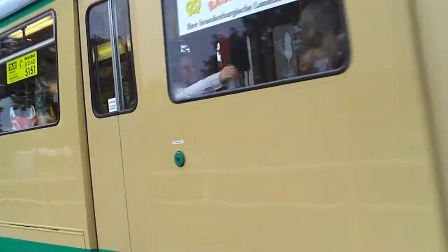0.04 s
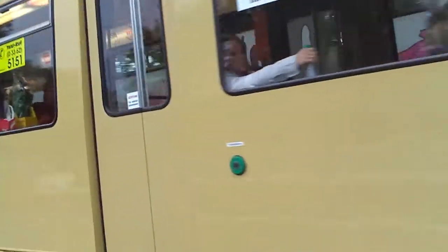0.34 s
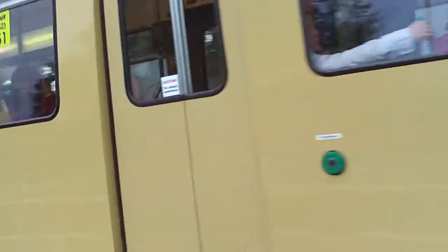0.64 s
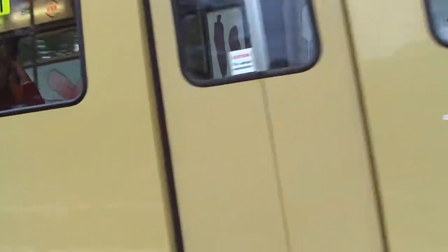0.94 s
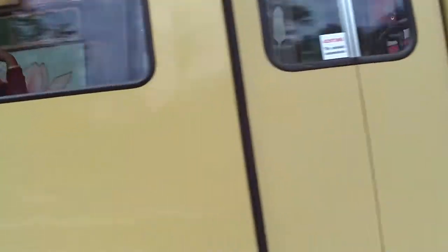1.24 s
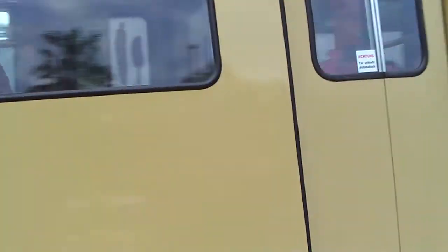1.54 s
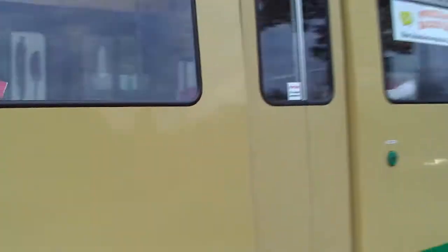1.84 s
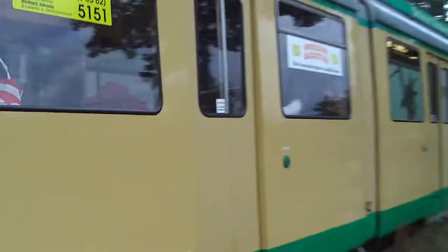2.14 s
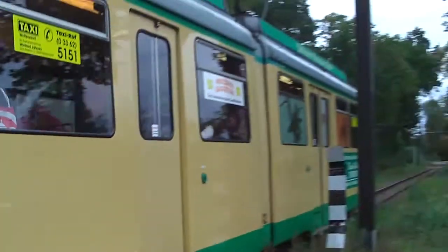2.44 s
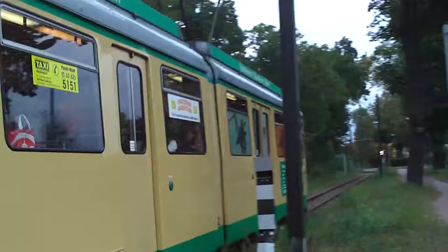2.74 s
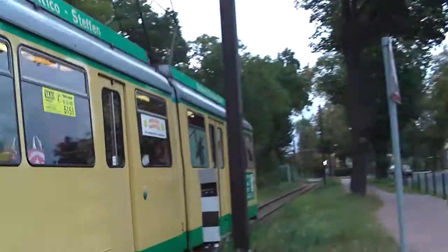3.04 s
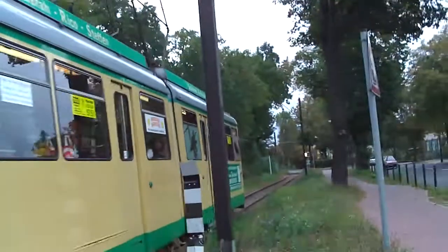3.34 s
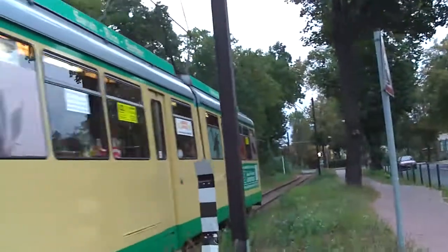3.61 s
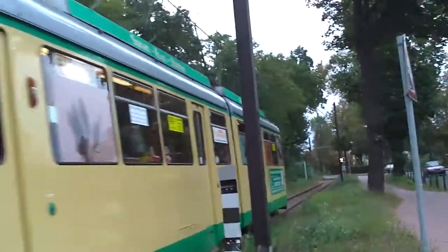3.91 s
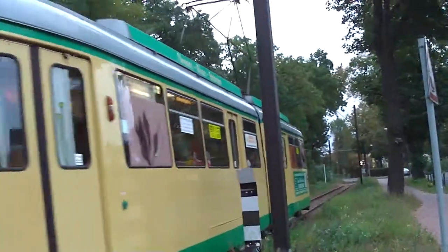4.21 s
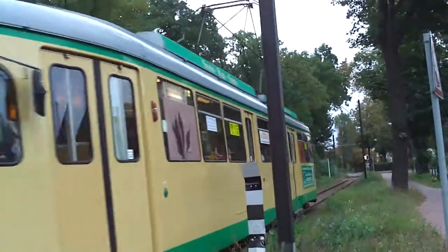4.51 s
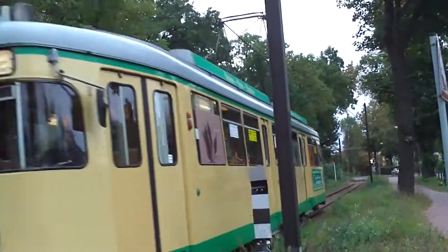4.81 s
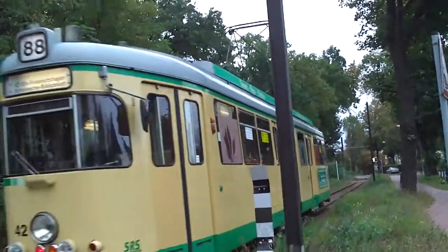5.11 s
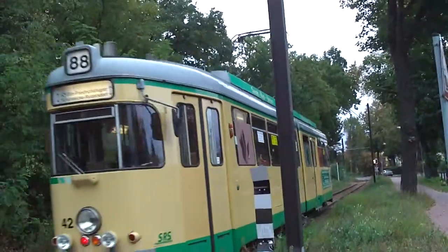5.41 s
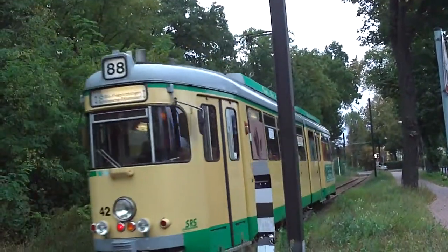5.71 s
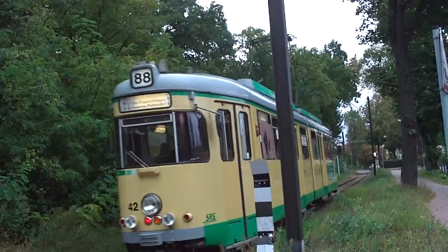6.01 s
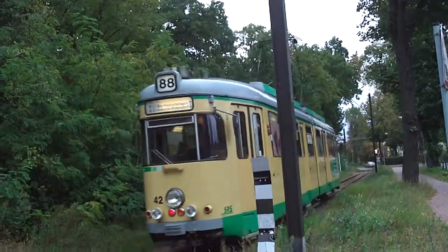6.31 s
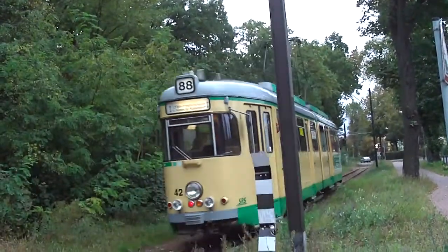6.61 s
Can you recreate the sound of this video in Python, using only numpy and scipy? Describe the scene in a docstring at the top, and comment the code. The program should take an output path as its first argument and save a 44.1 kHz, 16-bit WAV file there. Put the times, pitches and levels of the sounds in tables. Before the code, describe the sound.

An old tram rolls past very close, rails roaring and body rumbling with faint rattles, then draws away along the track.

```python
"""An old tram rolls past at arm's length and draws away along a tree-lined track.
Roughness between steel wheel and rail forces broadband vibration: the rails roar, the wheels hiss,
body and ground rumble, and lightly damped modes ring as a bogie sizzles by. An out-of-round wheel
thuds, the body booms and drones, loose fittings rattle faintly, and the motor's tone climbs above
a deep hum. The loudest peaks overload the microphone."""
import sys
import numpy as np
from scipy import signal
from scipy.fft import rfft, irfft, next_fast_len
from scipy.io import wavfile

SR = 44100
rng = np.random.default_rng(int(sys.argv[2]) if len(sys.argv) > 2 else 0)


def store_wav(level_fs):
    """Save 16-bit WAV to argv[1]."""
    pcm = np.round(np.clip(np.atleast_2d(level_fs), -1, 1) * 32767)
    wavfile.write(sys.argv[1], SR, pcm.T.astype(np.int16))


N = 293706
TIME = np.arange(N) / SR

# What faces the listener. Each row: time in seconds, power shares (0-1) of open bogie and far track.
VIEW = [(1.5, 0, 0.01), (2.3, 0.36, 0.12), (2.7, 0.89, 0.03), (3.25, 0.83, 0.12), (3.45, 0.38, 0.37),
        (4.4, 0.24, 0.53), (4.9, 0.04, 0.93), (6.66, 0.06, 0.95)]
# Running gear goes by or meets rougher rail. Each row: crest in seconds, half length in seconds,
# then the levels in dB of rail roar, wheel hiss and body rumble.
SURGES = [(0.898, 0.089, -19, -51, -18.5), (1.759, 0.47, -31, -33.5, -19), (2.654, 0.15, -15.5, -31.5, -15),
          (3.08, 0.19, -16.5, -24.5, -15.5), (3.726, 0.15, -18, -27.5, -35.5), (4.099, 0.11, -37, -31, -39),
          (5.0, .5, -29.5, -45, -27.5), (6.45, 0.25, -36, -39.5, -36)]


def from_db(db):
    """Amplitude grows tenfold for every 20 dB."""
    return 10 ** (np.asarray(db) / 20)


def in_time(rows):
    """Linear interpolation carries each column after the time to every sample."""
    times, *columns = np.transpose(rows)
    return [np.interp(TIME, times, column) for column in columns]


def shaped_noise(gain_at):
    """White noise takes on the spectrum of its filter; the result has unit power."""
    size = next_fast_len(N)
    hz = np.maximum(np.arange(size // 2 + 1) * SR / size, 1)
    return unit_power(irfft(rfft(rng.standard_normal(size)) * gain_at(hz), size)[:N])


def unit_power(x):
    """Dividing by the root mean square sets the power to one."""
    return x / np.sqrt(np.mean(x ** 2) + 1e-20)


def coloured(spectrum):
    """Band-limited noise follows a spectral envelope and falls steeply beyond its ends."""
    points_hz, db = np.transpose(spectrum)

    def gain_at(hz):
        skirts = 1 + (points_hz[0] / hz) ** 24 + np.minimum(hz / points_hz[-1], 10) ** 24
        return from_db(np.interp(np.log(hz), np.log(points_hz), db)) / skirts
    return shaped_noise(gain_at)


def drift(rate_hz):
    """Low-pass noise gives a smooth random fluctuation of unit spread."""
    return shaped_noise(lambda hz: 1 / (1 + (hz / rate_hz) ** 2) ** 2)


def in_view(side_spectrum, bogie_spectrum, far_spectrum):
    """Incoherent noises add in power, each by its share of the view."""
    bogie, far = np.clip(in_time(VIEW), 1e-4, 1)
    side = np.clip(1 - bogie - far, 0, 1)
    views = [(side, side_spectrum), (bogie, bogie_spectrum), (far, far_spectrum)]
    return sum(np.sqrt(share / (side + bogie + far)) * coloured(spectrum) for share, spectrum in views)


def passing(near_db, far_db, leaves_s, half_power_s):
    """Level in dB: steady alongside, then falling by the inverse square to what the far track carries."""
    nearness = 1 / (1 + (np.maximum(TIME - leaves_s, 0) / half_power_s) ** 2)
    return 10 * np.log10(nearness * from_db(near_db) ** 2 + (1 - nearness) * from_db(far_db) ** 2)


def swelling(base_db, crests, halves, levels_db):
    """Level in dB: Gaussian swells add in power to a base; a half length is one standard deviation."""
    power = from_db(base_db) ** 2
    for crest, half, db in np.broadcast(crests, halves, levels_db):
        power = power + from_db(db) ** 2 * np.exp(-0.5 * ((TIME - crest) / half) ** 2)
    return 10 * np.log10(power)


def phase_of(hz):
    """Phase is the integral of frequency, from a random start."""
    return 2 * np.pi * (np.cumsum(hz) / SR + rng.random())


def resonance(curve, width_hz):
    """A lightly damped mode under random forcing gives narrow-band noise about its gliding pitch."""
    hz, db = in_time(curve)
    phase = phase_of(hz)
    return from_db(db) * (drift(width_hz) * np.sin(phase) + drift(width_hz) * np.cos(phase))


def tone(hz, db, waver_db, wander=0.0039, wander_rate_hz=6):
    """A varying load modulates a sustained tone in amplitude and frequency."""
    amplitude = np.sqrt(2) * from_db(db + waver_db * drift(5.1))
    return amplitude * np.sin(phase_of(hz * (1 + wander * drift(wander_rate_hz))))


def rail_roar(flutter_db=0.5):
    """Roughness forces the rails to vibrate; the level flutters as the contact force varies."""
    # Spectra behind the side panels, at an open bogie and from afar.
    # Each row: frequency in Hz, level in dB.
    side = [(210, -30.5), (350, -0.5), (429, -3), (522, 3), (790, -4), (938, -2), (1280, -14),
            (1400, -11.5), (1600, -20), (2080, -52), (3520, -120)]
    bogie = [(210, -27.5), (350, -5.5), (449, -5.5), (539, -0.5), (727, -4.5), (981, -4), (1190, -9),
             (1290, -20.5), (1350, -14), (1600, -21), (2080, -42.5), (3520, -120)]
    far = [(210, -38), (350, -5), (371, -5), (472, -5.5), (493, -4.5), (536, -6), (709, -6.5), (760, -11),
           (810, -6.5), (903, -6), (1090, -4.5), (1170, -6), (1260, -17), (1370, -12), (1600, -20),
           (2080, -43), (3520, -120)]
    crests, halves, roar_db, _, _ = np.transpose(SURGES)
    base_db = passing(near_db=-16, far_db=-28.5, leaves_s=4, half_power_s=0.21)
    db = swelling(base_db, crests, halves, roar_db) + flutter_db * drift(11)
    return from_db(db) * in_view(side, bogie, far)


def wheel_hiss(grit_db=1.0):
    """The same roughness excites the steel wheels, which radiate at higher frequencies."""
    # Spectra behind the side panels, at an open bogie and from afar.
    # Each row: frequency in Hz, level in dB.
    side = [(850, -33), (1450, -2.5), (1950, -10.5), (2310, -9.5), (2670, -16), (3110, -16), (4020, -22.5),
            (5190, -26.5), (5880, -32), (6980, -46), (9070, -76), (15400, -120)]
    bogie = [(850, -30.5), (1450, -15), (1540, -3), (1800, -1), (2040, -4.5), (2390, -2.5), (2760, -10),
             (3230, -7.5), (3390, -18), (3640, -17), (4020, -27), (5230, -19.5), (6980, -40.5),
             (9070, -67.5), (15400, -120)]
    far = [(850, -32), (1450, -3.5), (1710, -2.5), (1920, 2), (2100, -3.5), (2360, -4), (2570, -9.5),
           (2950, -6), (3570, -15), (4490, -14.5), (5230, -19.5), (6000, -32.5), (6710, -37.5), (6980, -39),
           (9070, -69.5), (15400, -120)]
    crests, halves, _, hiss_db, _ = np.transpose(SURGES)
    base_db = passing(near_db=-32, far_db=-38, leaves_s=4.5, half_power_s=0.12)
    db = swelling(base_db, crests, halves, hiss_db) + grit_db * drift(35)
    return from_db(db) * in_view(side, bogie, far)


def body_rumble():
    """Structure-borne vibration from rolling radiates from the car body as low noise."""
    # Spectra alongside and from afar. Each row: frequency in Hz, level in dB.
    near = [(68, -38), (115, -4), (162, -2), (193, -1), (220, -2.5), (300, -3.5), (420, -16.5),
            (550, -46.5), (920, -120)]
    far = [(82, -33.5), (120, -7.5), (160, 2.5), (238, 0.5), (259, -3.5), (279, 0.5), (322, 0),
           (371, -12.5), (420, -14), (550, -40.5), (920, -120)]
    crests, halves, _, _, rumble_db = np.transpose(SURGES)
    base_db = passing(near_db=-14, far_db=-32.5, leaves_s=3, half_power_s=0.9)
    return from_db(swelling(base_db, crests, halves, rumble_db)) * in_view(near, near, far)


def ground_rumble(first_thud_s=0.027, wheel_turn_s=0.441, turns=6):
    """Rolling shakes the ground; periodic loading by an out-of-round wheel adds one thud a turn."""
    # Spectra alongside and from afar. Each row: frequency in Hz, level in dB.
    near = [(12, -4.5), (25, 2), (36, -0.5), (58, -0.5), (78, 2), (100, -2), (135, 1.5)]
    far = [(12, -7), (30, 0.5), (45, 0), (58, 2), (72, 0), (90, 2), (110, -5.5), (135, -8)]
    thuds = first_thud_s + wheel_turn_s * np.arange(turns)
    base_db = passing(near_db=-18.5, far_db=-22.5, leaves_s=4.5, half_power_s=0.5)
    return from_db(swelling(base_db, thuds, halves=0.064, levels_db=-16.5)) * in_view(near, near, far)


def rail_ring():
    """The rail resonates between its fastenings in three modes; the last bogie wakes the lowest."""
    # The course of each mode. Each row: time in seconds, pitch in Hz, level in dB.
    low = [(3.2, 850, -49), (3.7, 842, -27), (4.3, 824, -30), (4.9, 822, -43.5), (6.66, 820, -50)]
    middle = [(0, 1020, -34), (1.2, 995, -36), (2.0, 961, -25), (2.5, 952, -36.5), (3.3, 960, -32),
              (3.7, 965, -23.5), (4.2, 963, -32.5), (4.7, 1013, -32.5), (5.6, 1021, -36), (6.66, 1113, -37)]
    high = [(0, 1409, -37.5), (2, 1373, -39), (3.7, 1369, -37.5), (4.9, 1362, -45), (6.66, 1357, -48)]
    return resonance(low, width_hz=50) + resonance(middle, width_hz=79) + resonance(high, width_hz=40)


def deep_hum(waver_db=1.0):
    """A rotating machine under the floor gives a low tone with weak, phase-locked overtones."""
    # The course of the hum. Each row: time in seconds, pitch in Hz, level in dB.
    course = [(0, 54, -42.5), (1.7, 56.4, -22.5), (2.6, 60.4, -28.5), (3.1, 60.2, -23.5),
              (3.3, 61.5, -14.5), (3.47, 57, -25), (3.95, 62.5, -22.5), (4.35, 64.1, -18.5),
              (4.72, 62.8, -29), (4.97, 61.1, -17), (5.17, 59.7, -25), (5.38, 58, -20.5), (5.58, 58.4, -23),
              (5.8, 58.3, -23), (6.5, 58, -22.5), (6.66, 58.1, -30)]
    # Its partials. Each row: multiple of the pitch, level in dB relative to the hum.
    partials = [(1, -1), (1.5, -13), (2, -14)]
    hz, db = in_time(course)
    phase = phase_of(hz)
    return np.sqrt(2) * sum(from_db(db + partial_db + waver_db * drift(4)) * np.sin(multiple * phase)
                            for multiple, partial_db in partials)


def body_booms(wander=0.1):
    """Uneven track drives the sprung body into transient oscillations of a few low cycles."""
    # Each row: crest in seconds, level in dB, pitch in Hz, half length in seconds.
    booms = [(0.057, -1.5, 66.5, 0.013), (0.048, -2.5, 105.4, 0.012), (0.072, -8.5, 207.7, 0.012),
             (.822, -5.5, 104, .012), (0.87, -1.5, 190.2, 0.02), (0.888, -3, 106.2, .012),
             (0.972, -7, 98, 0.012), (1.095, -8.5, 199.3, .014), (1.305, -10.5, 128, 0.013),
             (1.352, -6.5, 71.2, 0.022), (1.39, -8.5, 162, .018), (1.675, -4, 61.5, 0.024),
             (1.781, -13, 56.7, 0.021), (1.82, -4.5, 103, .012), (1.84, -5, 149.9, .022),
             (1.914, -9, 59.7, 0.018), (1.995, -6, 136.6, .016), (1.989, -10.5, 217.3, 0.015),
             (2.205, -7.5, 113, 0.013), (2.223, -1.5, 62.4, .02), (2.385, -9.5, 243.8, 0.013),
             (2.601, -10, 240.4, 0.023), (2.875, -7, 186.3, 0.023), (3.222, -6.5, 299, .018),
             (3.716, -7.5, 60, .016), (4.046, -15, 65.2, 0.021), (4.594, -13, 118, .012),
             (4.638, -13, 212, .011)]
    out = np.zeros(N)
    bend = 1 + wander * drift(45)
    for crest, db, hz, half in booms:
        span = abs(TIME - crest) < 4 * half
        swell = np.exp(-0.5 * ((TIME[span] - crest) / half) ** 2)
        out[span] += from_db(db) * swell * np.sin(phase_of(hz * bend[span]))
    return out


def loose_fittings(chatter_db=3.0, band_ratio=1.17, top_hz=5800):
    """Many tiny metal impacts merge into bursts of band-limited noise that swell and die."""
    # Each row: start in seconds, level in dB, band centre in Hz, length in seconds.
    rattles = [(.11, -43, 4240, 0.037), (.461, -12, 834, .006), (1.204, -40, 3750, 0.042),
               (1.32, -50, 4500, 0.22), (1.495, -32, 1700, 0.052), (1.614, -23.5, 1450, 0.009),
               (1.715, -41, 4520, .073), (1.805, -44, 5400, 0.1), (2.347, -34.5, 3030, 0.05),
               (2.379, -12, 524, .016), (2.782, -42, 3600, 0.037), (2.96, -37, 5170, .025),
               (3.624, -43, 4000, .035), (3.79, -45, 4840, 0.051), (4.085, -41, 4758, 0.04),
               (4.199, -35.5, 2000, .3), (4.379, -14, 885, .009), (4.655, -37, 2005, 0.053)]
    out = np.zeros(N)
    chatter = from_db(chatter_db * np.tanh(drift(120))) * rng.standard_normal(N)
    for start, db, hz, length in rattles:
        age = np.clip(2 * (TIME - start) / length, 0, 20)
        envelope = age * np.exp(1 - age)
        band = signal.butter(2, [hz / band_ratio, hz * band_ratio], "band", fs=SR, output="sos")
        out += from_db(db) * envelope * unit_power(signal.sosfilt(band, chatter))
    return signal.sosfilt(signal.butter(6, top_hz, fs=SR, output="sos"), out)


def panel_drone(base_db=-42):
    """A body panel resonates in spells, gliding from the pitch of one to that of the next."""
    # Each row: crest in seconds, half length in seconds, level in dB, pitch in Hz.
    spells = [(.85, 0.088, -31, 185), (1.27, 0.069, -19, 200.6), (1.7, 0.28, -23.5, 200),
              (2.82, 0.14, -18.5, 193.4), (4.55, .09, -26.5, 247.8), (5.95, 0.099, -36, 238.1),
              (6.25, 0.23, -31.5, 238.3)]
    crests, halves, levels_db, pitches = np.transpose(spells)
    db = swelling(base_db, crests, halves, levels_db)
    return tone(np.interp(TIME, crests, pitches), db, waver_db=1.5)


def tread_sizzle(base_db=-67.5, grit_db=1.0):
    """Short-wavelength roughness of the treads makes high noise, strongest as an axle goes by."""
    # Each row: crest in seconds, half length in seconds, level in dB.
    swells = [(1.85, .14, -48), (2.96, .07, -42), (3.18, .1, -43.5), (6.298, .45, -54.5)]
    # Each row: frequency in Hz, level in dB.
    spectrum = [(3400, -6), (4100, -3.5), (4700, 0.5), (5250, -1), (5900, -11), (6200, -18)]
    db = swelling(base_db, *np.transpose(swells)) + grit_db * drift(90)
    return from_db(db) * coloured(spectrum)


def motor(start_hz=109.8, rise_hz_per_s=4.45, top_hz=130.2, base_db=-43.5):
    """The motor's frequency follows its rotation speed, climbing steadily and then holding."""
    # Driven bogies go by. Each row: crest in seconds, half length in seconds, level in dB.
    swells = [(2.1, .2, -24), (3.99, .13, -20), (4.55, 0.24, -23.5)]
    hz = np.minimum(start_hz + rise_hz_per_s * TIME, top_hz)
    return tone(hz, swelling(base_db, *np.transpose(swells)), waver_db=1.0)


def flange_song(base_db=-62.5):
    """Friction of flange on rail sustains one wheel mode at a trembling pitch as the bogie goes by."""
    # Each row: crest in seconds, half length in seconds, level in dB, pitch in Hz.
    spells = [(2.62, .015, -35, 1800), (2.69, .03, -31, 1795), (2.835, 0.025, -28.5, 1800),
              (2.985, .012, -29, 1795), (3.06, .013, -22.5, 1778), (3.28, .016, -30, 1735),
              (3.315, 0.01, -22.5, 1785)]
    crests, halves, levels_db, pitches = np.transpose(spells)
    db = swelling(base_db, crests, halves, levels_db)
    return tone(np.interp(TIME, crests, pitches), db, waver_db=1.0, wander=0.007, wander_rate_hz=70)


def wheel_ring():
    """A higher wheel mode resonates under random forcing, loudest when the bogie is nearest."""
    # Each row: time in seconds, pitch in Hz, level in dB.
    course = [(2.6, 2400, -56), (2.88, 2400, -39), (3.03, 2380, -40), (3.09, 2365, -30), (3.14, 2375, -44),
              (3.2, 2385, -32), (3.3, 2380, -37), (3.4, 2350, -54), (3.6, 2320, -61.5)]
    return resonance(course, width_hz=55)


def scene():
    """The sounds of the tram superpose at one spot beside the track."""
    rolling = rail_roar() + wheel_hiss() + body_rumble() + ground_rumble() + rail_ring()
    car = deep_hum() + body_booms() + loose_fittings() + panel_drone()
    bogies = tread_sizzle() + motor() + flange_song() + wheel_ring()
    return (rolling + car + bogies)[None]


def low_pass(x, hz):
    """Elliptic filtering forwards and backwards cuts the treble steeply without phase shift."""
    return signal.sosfiltfilt(signal.ellip(8, 0.05, 50, hz, fs=SR, output="sos"), x)


def record(dry):
    """A narrow-band microphone saturates near full scale, so the highest peaks crackle faintly."""
    fade_s, ceiling = 0.004, 0.99
    fade = np.minimum(TIME / fade_s, 1)
    narrow = low_pass(dry * fade * fade[::-1], hz=7200)
    clipped = narrow / (1 + (narrow / ceiling) ** 32) ** (1 / 32)
    return low_pass(clipped, hz=15500)


dry = scene()
out = record(dry)
store_wav(out)
```